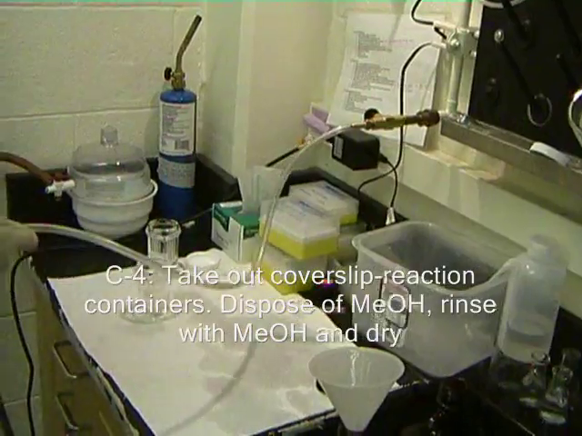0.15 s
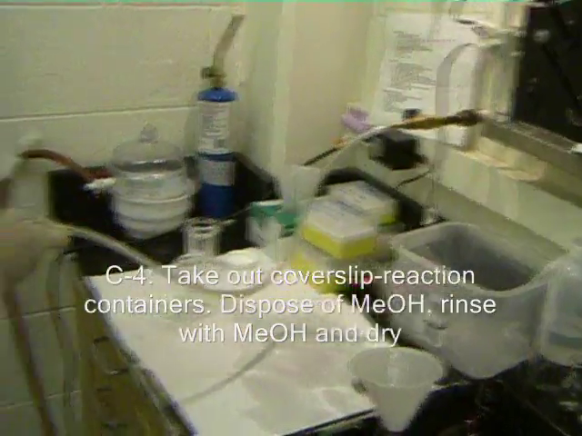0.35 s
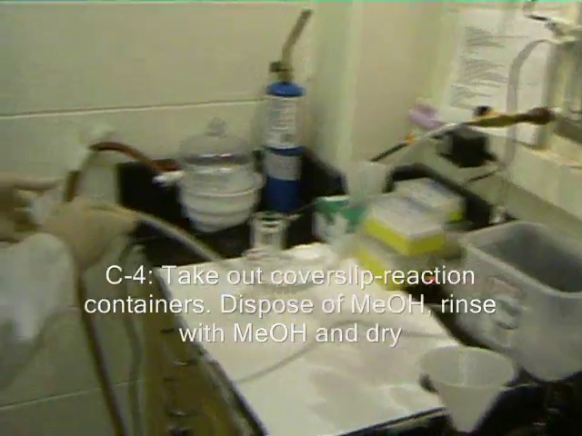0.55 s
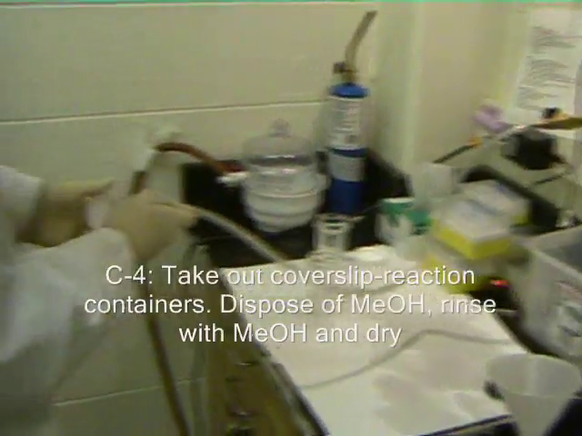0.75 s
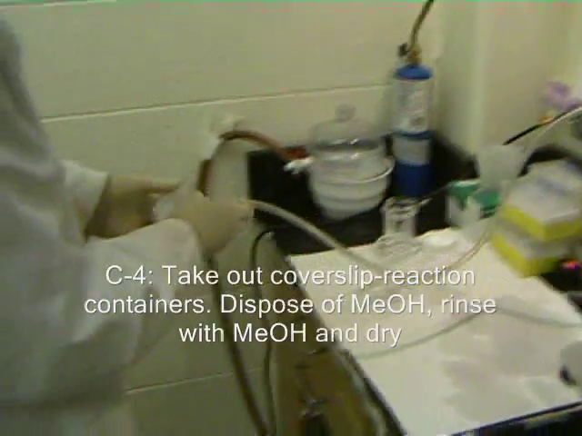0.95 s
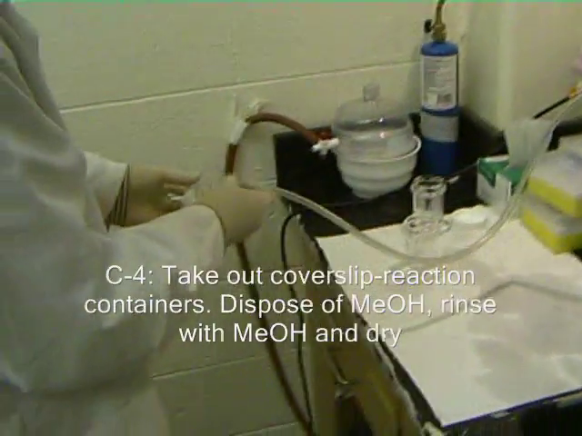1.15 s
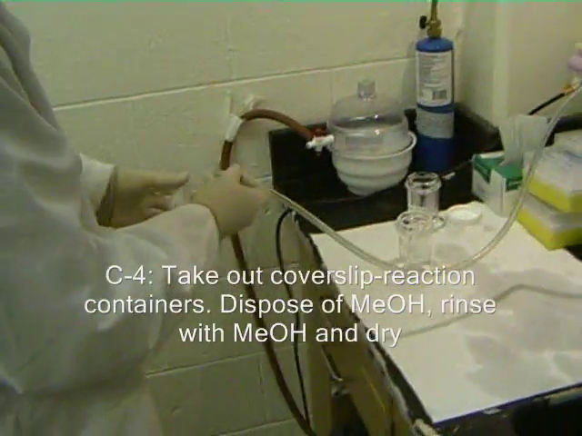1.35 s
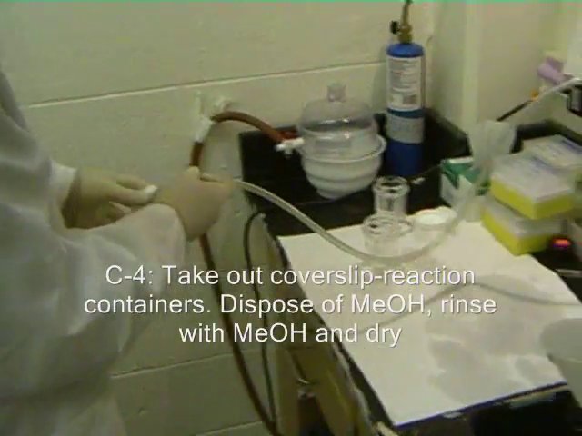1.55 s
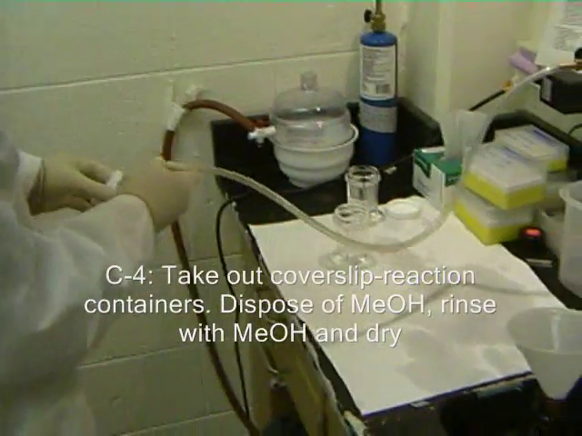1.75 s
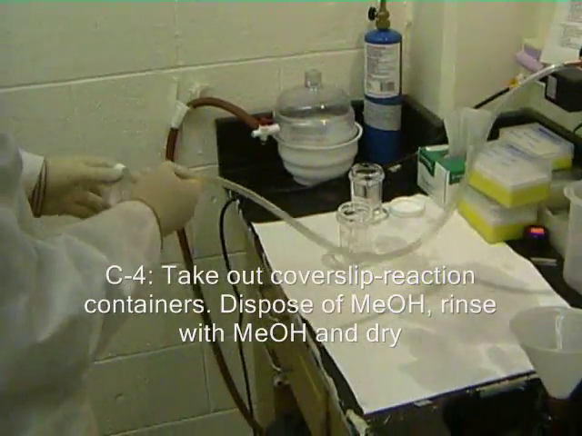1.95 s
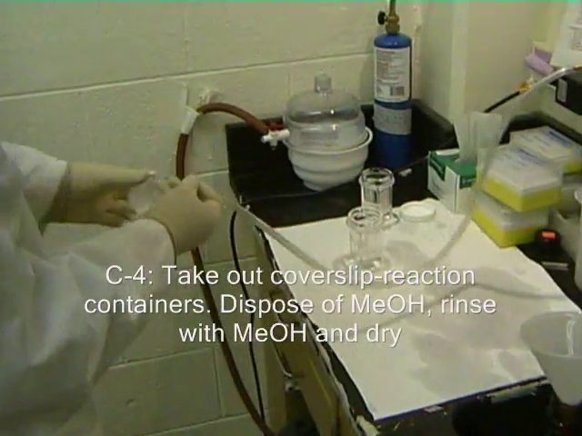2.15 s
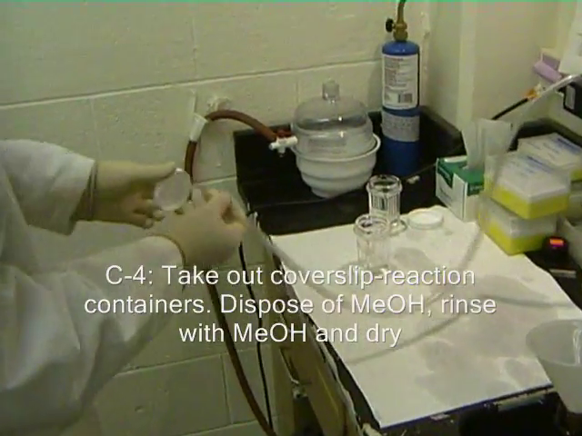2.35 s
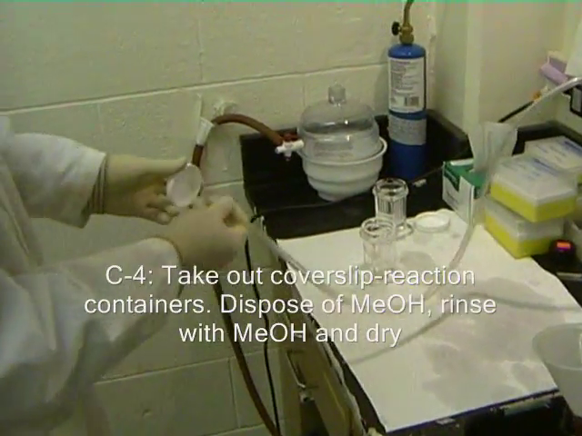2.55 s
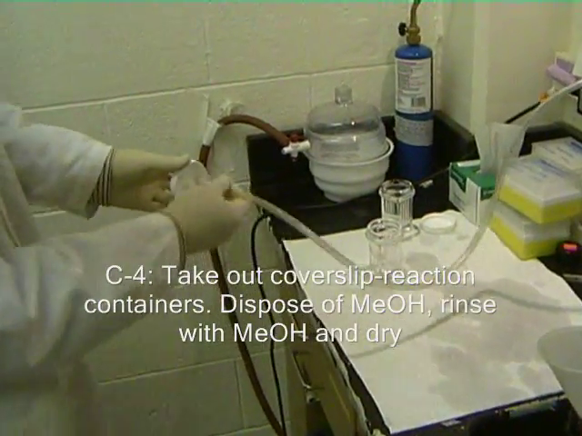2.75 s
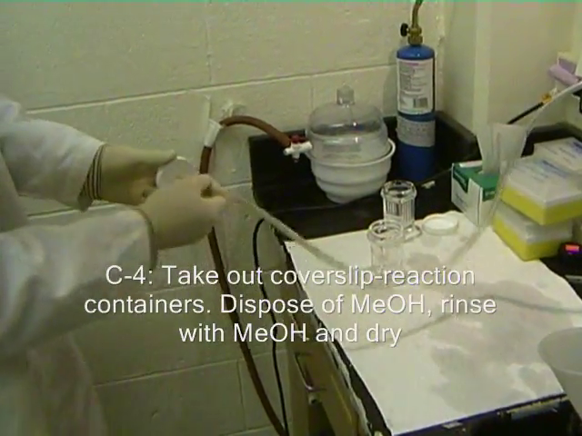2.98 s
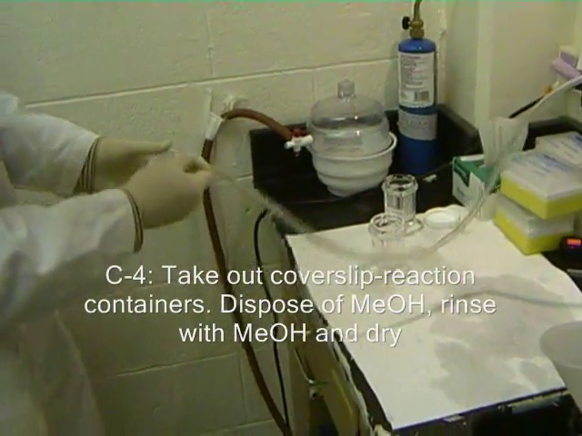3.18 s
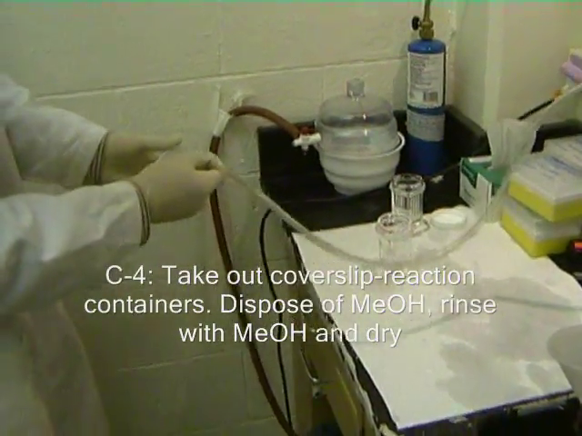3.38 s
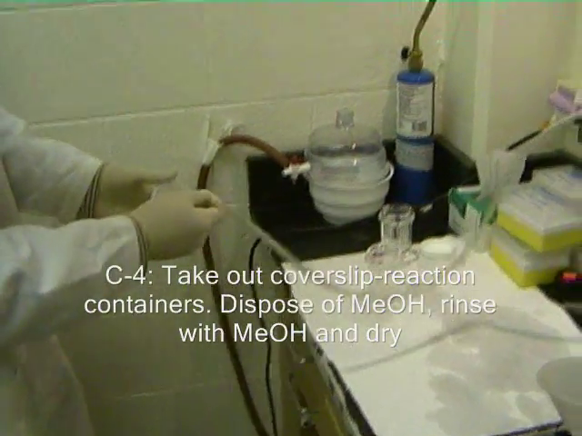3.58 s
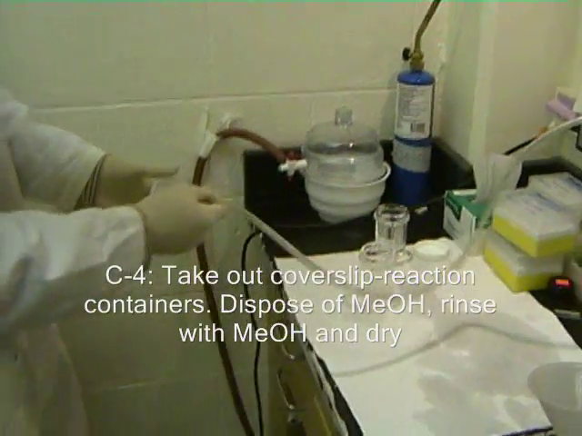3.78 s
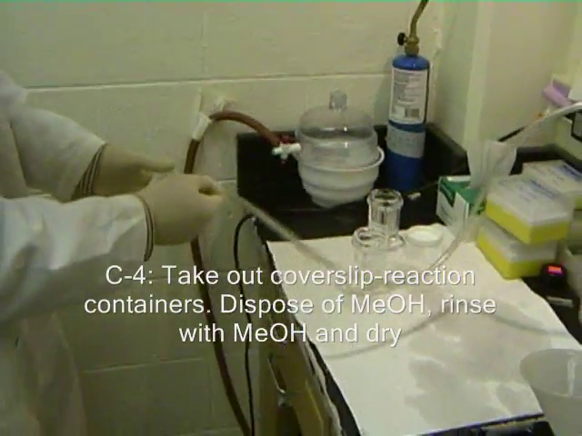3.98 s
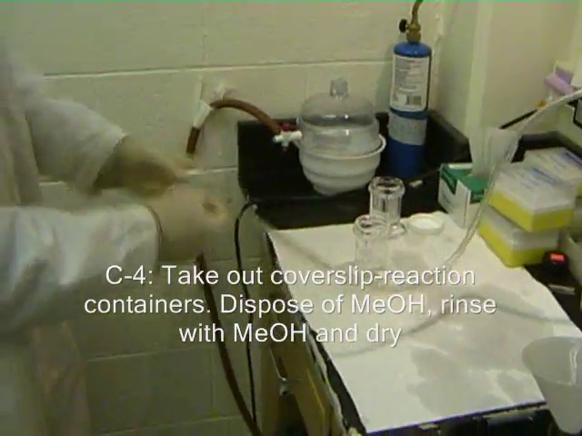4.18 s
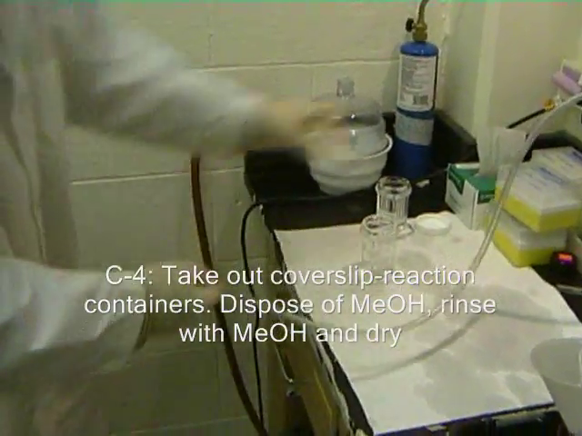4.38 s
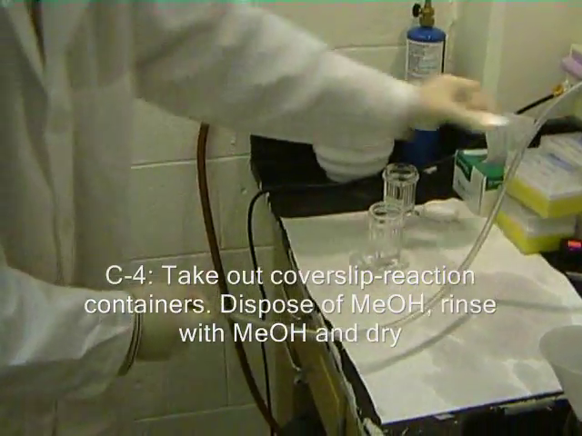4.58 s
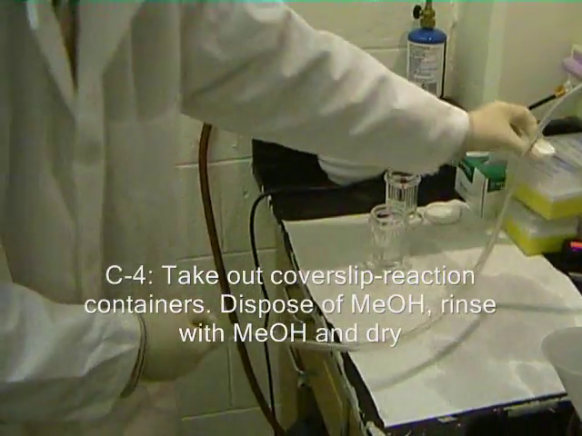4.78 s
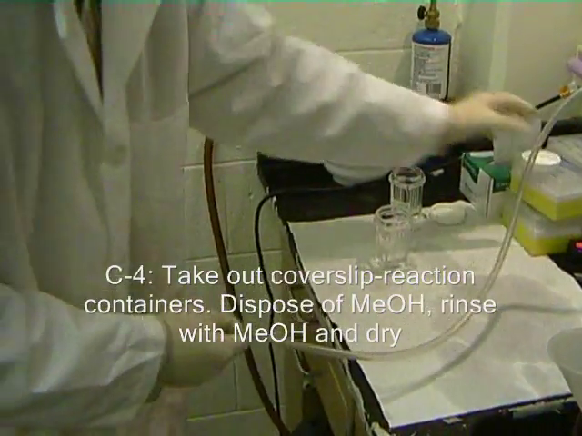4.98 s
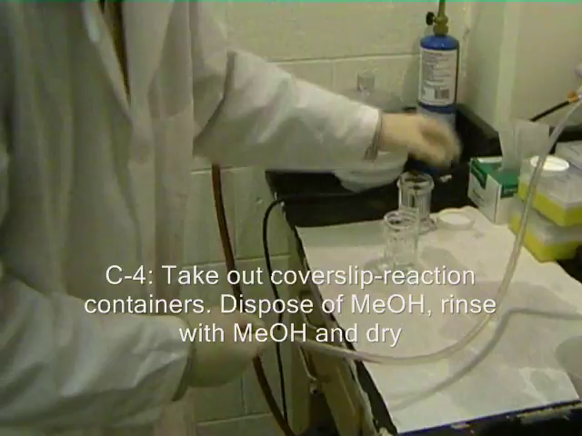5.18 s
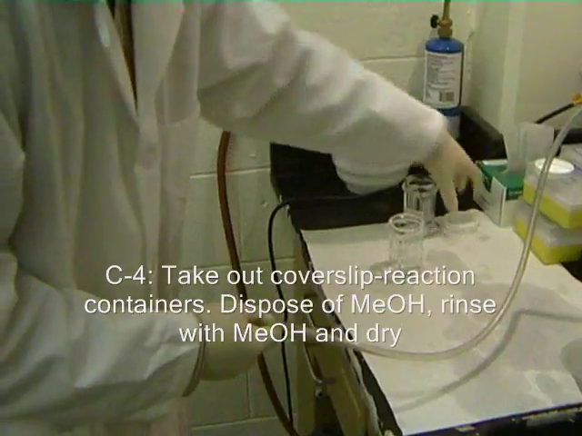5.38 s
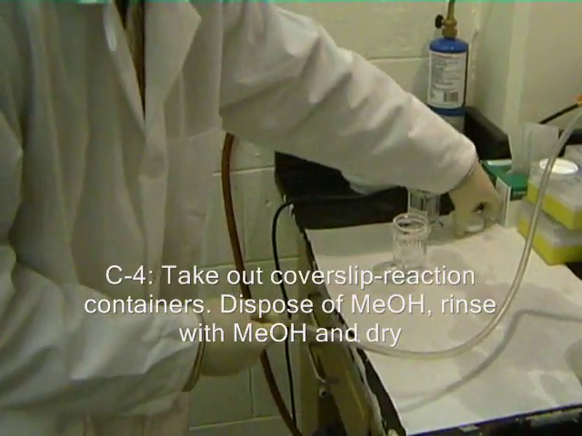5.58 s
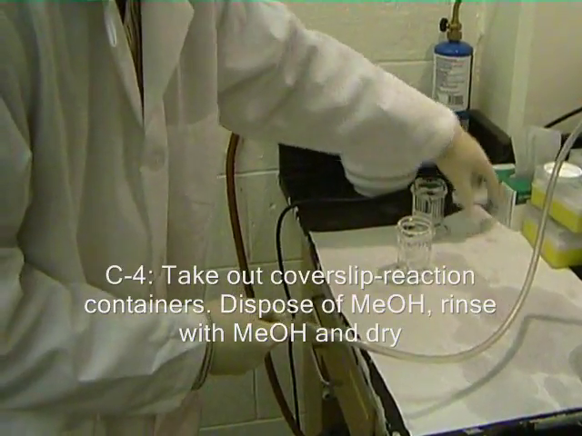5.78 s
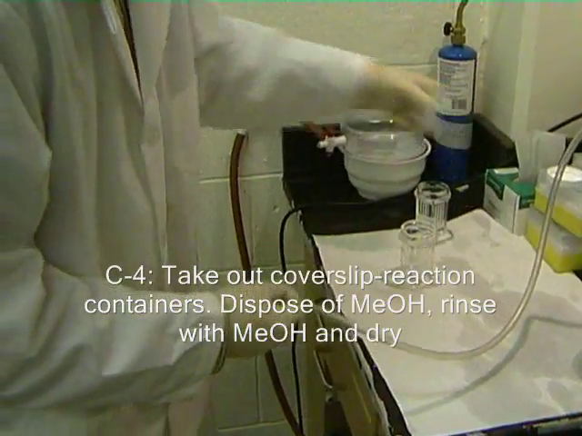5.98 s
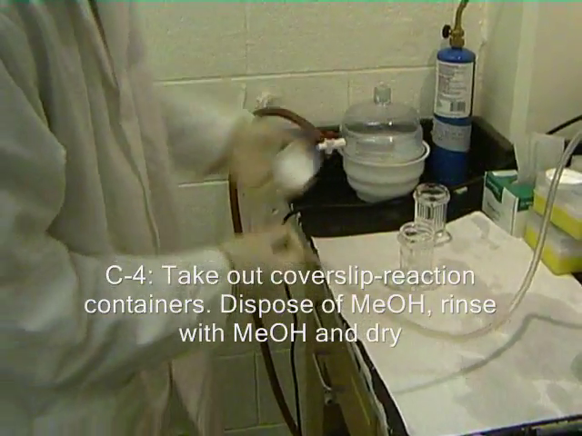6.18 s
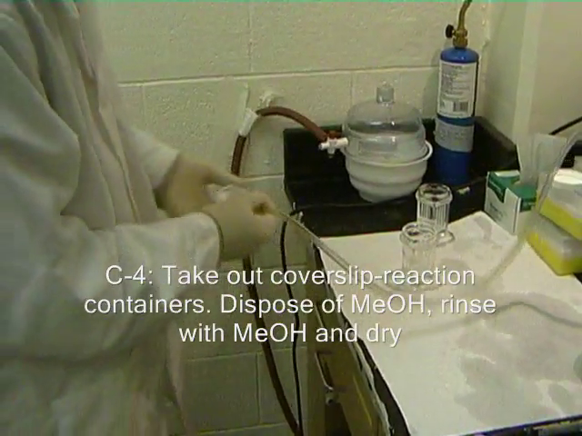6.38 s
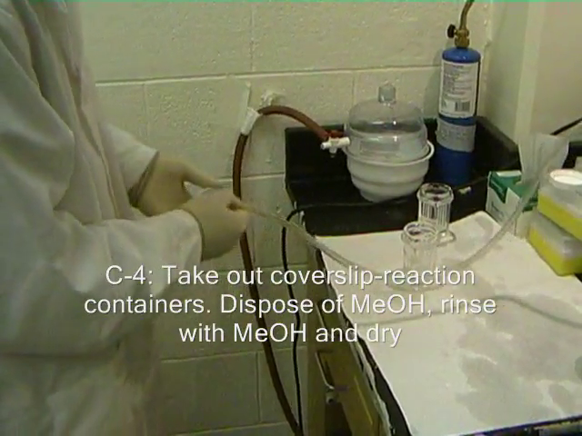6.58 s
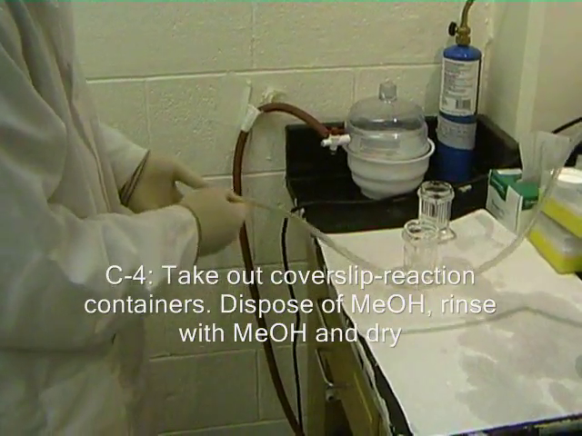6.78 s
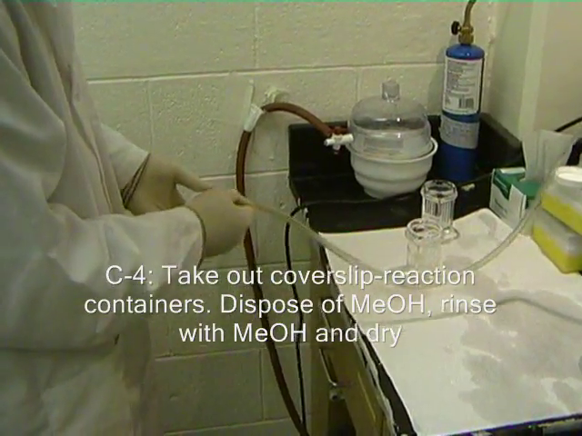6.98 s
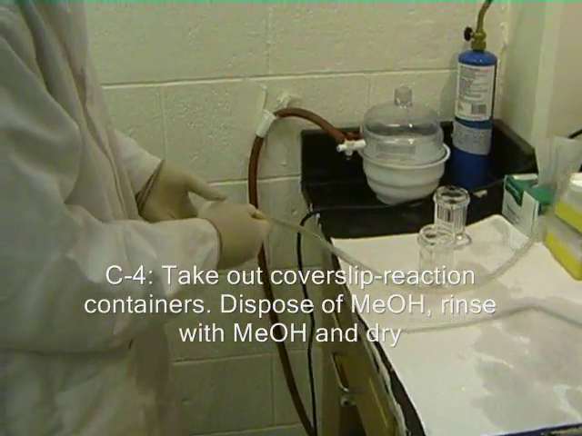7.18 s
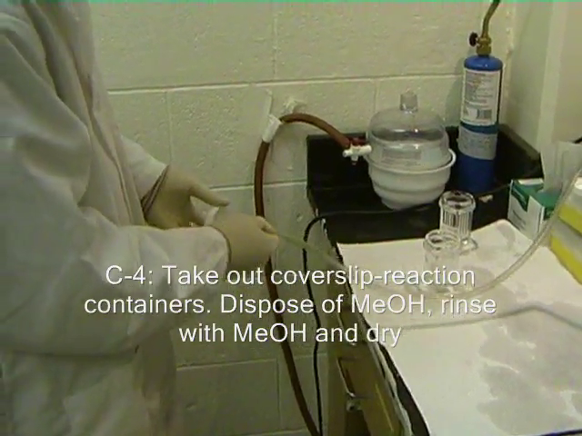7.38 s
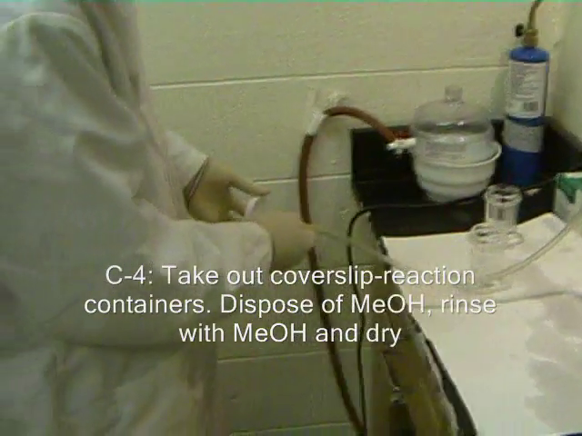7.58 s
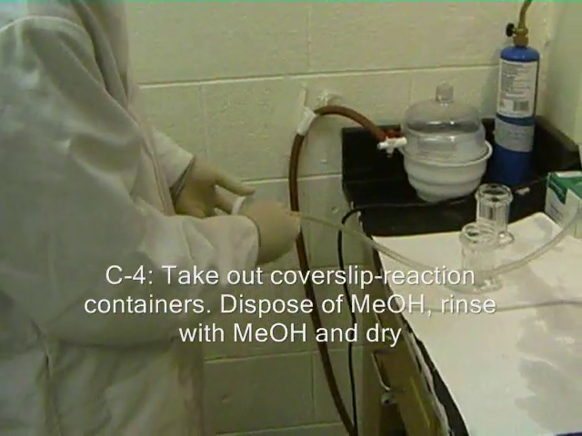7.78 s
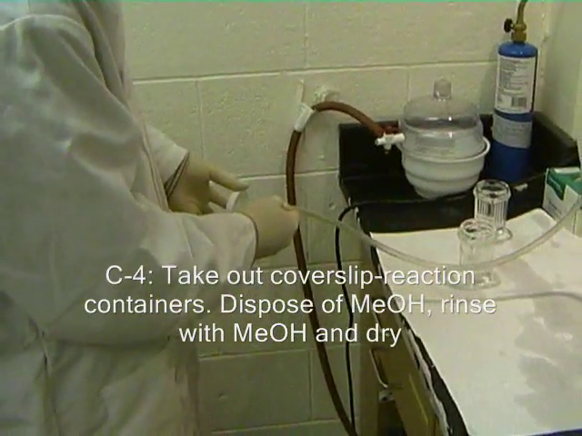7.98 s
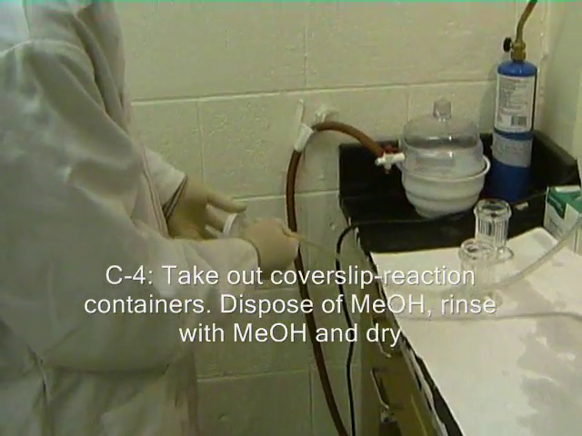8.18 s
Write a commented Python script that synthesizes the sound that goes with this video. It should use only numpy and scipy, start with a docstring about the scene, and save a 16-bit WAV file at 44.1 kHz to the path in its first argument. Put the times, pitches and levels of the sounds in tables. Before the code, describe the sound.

A jet of compressed gas hisses continuously, close to the microphone, in a small hard room with low, steady ventilation hum. From 0.2 to 0.8 seconds it bursts strongly into a small container, with rough hollow rushes and a soft low thump. Until about 4.3 seconds the hiss flutters restlessly, broken by short lower rushes and bright spurts at rims, notably around 1.5, 2.1 and a very sharp one at 3.0. Then it drops to a quieter, smoother open-air hiss, and at 5.07 a small hard piece clicks dryly on the bench. The free hiss grows slightly brighter and stronger until 6.3. At 6.5 a loud, hollow, almost whistling puff with a low thump marks the jet entering another container. Sputtering rushes continue, with spurts near 7.1 and 7.8, and the hiss is still running at the end, past 8 seconds.

```python
"""Gas hisses from a hose at close range, rushes lower and louder in containers and spurts at rims.
Midway the jet blows into open air and a piece clicks down on the bench; ventilation hums behind.
The gas is stereo noise shaped frame by frame by summed power spectra; click: decaying modes;
thumps: soft, decaying offset steps; ventilation: steady coloured noise. Loud spurts duck the mix."""
import sys
import numpy as np
from scipy import signal
from scipy.fft import rfft, irfft
from scipy.io import wavfile
from scipy.ndimage import uniform_filter1d

SR = 44100
rng = np.random.default_rng(int(sys.argv[2]) if len(sys.argv) > 2 else 0)


def int16_out(signal):
    """Quantize to a 16-bit WAV file."""
    q = np.round(np.clip(np.atleast_2d(signal).T, -1, 1) * 32767)
    wavfile.write(sys.argv[1], SR, q.astype(np.int16))


N = 363825
TOP_HZ = 15720  # upper band edge
FRAME, HOP = 512, 128  # samples
TIME = np.arange(N) / SR
FRAME_S = np.arange(N // HOP + 2) * HOP / SR
BIN_HZ = np.maximum(np.arange(FRAME // 2 + 1), .5)[:, None] * SR / FRAME

# nozzle dips into a container: start/s, end/s, level/dB, spectral knee/Hz
DIPS = [(0.173, 0.528, -22.5, 1730), (.52, 0.652, -16.5, 2920), (0.666, 0.816, -26.5, 1880),
        (1.012, 1.065, -25.5, 2300), (1.262, 1.412, -25, 2160), (1.49, 1.61, -24.5, 1650),
        (1.73, 1.85, -27.5, 1900), (1.944, 2.045, -23, 1700), (2.081, 2.142, -22, 1840),
        (2.165, 2.262, -26.5, 1830), (2.352, 2.514, -25.5, 2300), (2.66, 2.78, -26, 3020),
        (2.884, 2.924, -28, 2000), (3.333, 3.389, -23.5, 3330), (3.56, 3.664, -25, 3320),
        (3.824, 3.935, -24.5, 3800), (4.258, 4.34, -24, 2350), (6.397, 6.47, -30, 1200),
        (6.55, 6.696, -24.5, 2800), (6.712, 6.761, -25, 1920), (6.82, 6.87, -23.5, 2900),
        (6.927, 6.968, -25, 1700), (7.172, 7.22, -26, 4600), (7.28, 7.4, -27, 3150),
        (7.41, 7.517, -29, 2860), (7.52, 7.602, -23, 2620), (8.142, 8.188, -22.5, 3700)]
# container resonances: f/Hz, width/Hz, lift/dB
HOLLOW = [(1944, 49, 5), (2360, 64, 8), (2720, 42, 5.5), (2944, 89, 7), (4820, 160, 2), (7900, 420, 3),
          (10050, 5500, -3), (12200, 1700, 2)]


def gas(flutter_db=1.18, patchy_db=1.63, glove_echo=0.2, glove_lag_s=.0013, sway=0.212, open_width=0.69):
    """One turbulent flow: jet, rush, spurts, tone and whooshes add as power, then shape noise."""
    # side relative to mid at full contact: f/Hz, level/dB
    side_points = [(300, -31), (1000, -8), (2300, -15), (3200, -14), (5000, -5), (8000, -4.5),
                   (12000, -0.5), (16000, 4)]
    jet_power, jet_db = free_jet()
    rush_power, rush_gain = container_rush()
    power = jet_power + rush_power + rim_spurts() + cavity_tone() + whooshes()

    # reflection off the moving hand combs the hiss
    lag_s = glove_lag_s * np.exp(sway * walk(2.45))
    comb = 1 + glove_echo * np.cos(2 * np.pi * BIN_HZ * lag_s)

    # against a surface the jet flutters as a whole and in patches of pitch
    contact = rush_gain / (rush_gain + undb(jet_db - 11.5))
    patches = uniform_filter1d(walk(22, count=len(BIN_HZ)), size=9, axis=0)
    patches /= patches.std()
    flutter = undb(contact * (flutter_db * walk(60) + patchy_db * patches))
    gain = np.sqrt(power) * comb * flutter

    # gas scattered by the container sounds wider than the open jet
    width = colour(side_points, BIN_HZ) * (open_width + (1 - open_width) * contact)
    noise = rng.standard_normal((2, (len(FRAME_S) - 1) * HOP))
    mid, side = signal.stft(noise, nperseg=FRAME, noverlap=FRAME - HOP)[2]
    shaped = gain * spread(mid, side, width)
    return signal.istft(shaped, nperseg=FRAME, noverlap=FRAME - HOP)[1][:, :N]


def free_jet(offset_db=5.0, shield_db=-3):
    """Broadband jet hiss; brighter as the nozzle swings to the microphone, shielded by walls in dips."""
    # level before offset and shielding as the hose moves: t/s, level/dB
    level_points = [(0.0, -38.5), (0.2, -34.5), (0.34, -34), (0.82, -32.5), (1.15, -32), (1.77, -30),
                    (2.09, -31), (2.78, -30), (4.16, -30), (4.3, -35), (5.08, -37.5), (5.65, -34),
                    (6.25, -34), (6.69, -29.5), (6.87, -31), (7.74, -33.5), (7.9, -35), (8.25, -33.5)]
    # jet spectrum, relative: f/Hz, level/dB
    jet_points = [(150, -32.5), (700, -20), (1500, -9.5), (2400, -7), (2950, -3.5), (3700, -2), (5200, 2.5),
                  (6600, 2.5), (8000, 0), (9500, -2.5), (12100, 0.5), (14500, 0), (16000, -7)]
    # nozzle swing toward the microphone: t/s, aim/0-1
    aim_points = [(5.0, 0), (5.4, .8), (5.9, 1), (6.3, 0.6), (6.5, 0)]
    # forward beaming at full aim: f/Hz, width/Hz, lift/dB
    beam_modes = [(5160, 910, 1.5), (8800, 2900, -1), (12000, 2500, 5)]
    dipped = sum(stay(start, end) for start, end, _, _ in DIPS)
    level_db = np.interp(FRAME_S, *np.transpose(level_points)) + offset_db + shield_db * dipped
    beam = resonances(beam_modes, BIN_HZ) ** np.interp(FRAME_S, *np.transpose(aim_points))
    return unit(colour(jet_points, BIN_HZ) * beam) * undb(level_db) ** 2, level_db


def container_rush(wander_db=1.5, wander_hz=3):
    """Eddies ring the container; returns power and total gain. Dips are mostly louder and lower."""
    # container held in the jet: start/s, end/s, level/dB, spectral knee/Hz
    holds = [(-.2, 0.023, -28, 3500), (.17, 3.04, -30, 2970), (3.1, 4.35, -28, 3680),
             (6.46, 8.4, -30, 3600)]
    start_s, end_s, db, knee_hz = np.transpose(holds + DIPS)[:, :, None]
    # the hand is never still
    rush = stay(start_s, end_s) * undb(db + wander_db * walk(wander_hz)) ** 2
    spectra = unit(resonances(HOLLOW, BIN_HZ) * eddies(knee_hz.T, rise=4.0, fall=1.22))
    return spectra @ rush, np.sqrt(rush.sum(axis=0))


def rim_spurts():
    """Short bursts of eddies as the jet crosses a rim or a fingertip."""
    # crossings: t/s, peak/dB, sigma/s, spectral knee/Hz
    crossings = [(0.199, -16.5, 0.0065, 7110), (0.252, -13.5, 0.015, 4870), (0.529, -11.5, 0.0087, 5460),
                 (0.603, -14, 0.017, 5100), (1.028, -24, 0.026, 6490), (1.247, -26.5, 0.0033, 800),
                 (1.508, -11.5, 0.0072, 3270), (1.615, -15, 0.015, 9500), (1.703, -18.5, 0.026, 8000),
                 (1.809, -17, 0.0097, 5930), (1.936, -15, 0.004, 6140), (2.046, -16.5, 0.0045, 6120),
                 (2.117, -13.5, 0.0079, 4460), (2.186, -15.5, 0.0062, 2050), (2.253, -14.5, 0.0081, 4580),
                 (2.58, -20.5, 0.011, 4110), (2.638, -18.5, 0.029, 7450), (2.841, -19, 0.011, 5660),
                 (2.93, -19, 0.02, 6400), (3.005, -11.5, 0.011, 5830), (3.024, -4, 0.001, 4740),
                 (3.148, -17, 0.014, 7450), (3.253, -15.5, 0.0089, 8240), (3.474, -16.5, 0.011, 6740),
                 (3.509, -12, 0.0049, 6600), (3.734, -16.5, 0.0067, 4300), (3.867, -24, 0.0086, 6500),
                 (4.105, -27, 0.016, 2800), (4.171, -21.5, 0.01, 4600), (4.297, -12, 0.011, 5770),
                 (6.484, -15, 0.013, 1970), (6.518, -10, 0.023, 3120), (6.704, -18.5, 0.0096, 8800),
                 (6.722, -32, 0.011, 990), (6.762, -20, 0.0085, 8420), (6.918, -20.5, 0.0067, 8410),
                 (6.973, -22, 0.015, 7900), (7.07, -12.5, 0.013, 4200), (7.303, -17.5, 0.013, 8330),
                 (7.343, -22.5, 0.011, 4070), (7.706, -23.5, 0.013, 5730), (7.803, -15, 0.014, 5130),
                 (7.852, -19.5, 0.0082, 3870), (8.039, -18.5, 0.014, 8950), (8.123, -17, 0.012, 10000)]
    s, db, sigma_s, knee_hz = np.transpose(crossings)[:, :, None]
    spectra = unit(resonances(HOLLOW, BIN_HZ) * eddies(knee_hz.T, rise=4.66, fall=1.59))
    return spectra @ swell(s, db, sigma_s)


def cavity_tone(cavity_hz=2990, half_width_hz=330):
    """The jet aims into the mouth and the cavity sings: a narrow noise band."""
    # jet at the mouth: t/s, peak/dB, sigma/s
    blows_across = [(0.239, -21, 0.01), (1.308, -25, 0.013), (3.214, -29.5, .022), (3.635, -39, 0.039),
                    (4.296, -26, 0.011), (6.495, -7, 0.013), (6.524, -15, 0.018)]
    band = unit(1 / (1 + ((BIN_HZ - cavity_hz) / half_width_hz) ** 2))
    return band * sum(swell(*row) for row in blows_across)


def whooshes(knee_hz=420):
    """Low eddies as the gas swirls past glove and sleeve."""
    # swirls: t/s, peak/dB, sigma/s
    swirls = [(0.18, -42.5, 0.059), (1.302, -48, 0.023), (1.78, -38.5, 0.012), (6.42, -42, 0.038)]
    return unit(eddies(knee_hz, rise=3.7, fall=1.65)) * sum(swell(*row) for row in swirls)


def knocks(contact_s=0.00026, lowest_hz=300):
    """Piece set down: damped modes that build during contact and die in milliseconds."""
    # contacts, scaling the modes: t/s, level/dB
    contacts = [(5.0647, -10), (5.0667, -33), (5.067, -25)]
    # modes of the piece: f/Hz, level/dB, t60/s
    piece_modes = [(600, -14, 0.02), (1400, -15.5, 0.028), (2340, -15, 0.011), (2580, 3, 0.0068),
                   (3350, -2, 0.0087), (4170, -5, 0.0093), (5400, -4, .008), (7340, -5, .005)]
    t = TIME[:SR // 4]
    ring = sum(undb(db) * np.cos(2 * np.pi * hz * t) * undb(-60 * t / t60_s) for hz, db, t60_s in piece_modes)
    blows = np.zeros(N)
    for s, db in contacts:
        blows[int(s * SR)] += undb(db)
    click = signal.fftconvolve(blows, ring * (1 - np.exp(-t / contact_s)))[:N]
    return signal.sosfilt(signal.butter(2, lowest_hz, "high", fs=SR, output="sos"), click)


def thumps(rise_s=0.0058, decay_s=0.052):
    """Low thumps under the hardest spurts: offset steps that rise softly and decay."""
    # steps, timed at mid-rise: t/s, level/dB
    steps = [(.243, -27.5), (.525, -37), (1.5, -31), (2.255, -49), (2.995, -41), (4.292, -34), (6.483, -22),
             (7.07, -42), (7.8, -38)]
    out = np.zeros(N)
    for s, db in steps:
        age_s = np.maximum(TIME - s + rise_s / 2, 0)
        rise = np.sin(np.pi / 2 * np.minimum(age_s / rise_s, 1)) ** 2
        out += undb(db) * rise * np.exp(-age_s / decay_s)
    return out


def ventilation(rms_db=-44.0, pan_db=2.0):
    """Steady air noise with a low hum and duct resonances."""
    # air spectrum, relative: f/Hz, level/dB
    air_points = [(20, 5), (60, -16), (95, -8), (150, 0.5), (230, -3), (330, -5), (470, -6.5), (630, -4.5),
                  (1200, -8), (3000, -11), (12000, -28.5)]
    # duct resonances: f/Hz, width/Hz, lift/dB
    duct_modes = [(118.7, 4.1, 13.8), (267, 35, 4), (367, 41, 8.8), (871, 30, 6.5)]
    # side relative to mid: f/Hz, level/dB
    side_points = [(25, 15), (60, 10), (125, 11.5), (250, 0), (500, -4), (1500, -13.5)]
    hz = np.maximum(np.arange(N // 2 + 1) * SR / N, 1)
    noise = rfft(rng.standard_normal((2, N)))
    mid, side = noise * colour(air_points, hz) * resonances(duct_modes, hz)
    air = irfft(spread(mid, side, colour(side_points, hz)), N)
    return air / air.std() * undb(rms_db + np.array([[pan_db], [-pan_db]]) / 2)


def room(x, shared_db, apart_db, t60_s):
    """Wall and bench reflections: one part alike at both microphones, one opposite in sign."""
    t = TIME[:SR // 3]
    tails = rng.standard_normal((2, len(t))) * undb(-60 * t / t60_s) * (t > .002)
    shared, apart = tails / np.linalg.norm(tails, axis=1, keepdims=True)
    echoes = undb(shared_db) * shared + undb(apart_db) * np.array([apart, -apart])
    echoes[:, 0] = 1  # direct sound
    return signal.fftconvolve(np.atleast_2d(x), echoes / np.linalg.norm(echoes[0]), axes=1)[:, :N]


def undb(db):
    """Decibels to gain."""
    return 10 ** (np.asarray(db) / 20)


def colour(points, hz):
    """Gain of (f/Hz, level/dB) points joined on a log-frequency axis."""
    f, db = np.transpose(points)
    return undb(np.interp(np.log(hz), np.log(f), db))


def resonances(modes, hz):
    """Gain of bell-shaped lifts, summed in dB."""
    return undb(sum(db / (1 + (2 * (hz - f) / width) ** 2) for f, width, db in modes))


def walk(rate_hz, count=1):
    """Smooth random rows, overall spread 1, one value a frame."""
    k = max(int(SR / HOP / rate_hz), 1)
    rows = uniform_filter1d(uniform_filter1d(rng.standard_normal((count, len(FRAME_S))), k), k)
    return rows / rows.std()


def unit(gain):
    """Power spectrum cut near TOP_HZ, with a mean of 1 over all bins."""
    power = gain ** 2 * (BIN_HZ < TOP_HZ + SR / FRAME)
    return power / power.mean(axis=0)


def eddies(knee_hz, rise, fall):
    """Turbulence gain: power rises steeply to the main eddies' size, falls gently above."""
    ratio = BIN_HZ / knee_hz
    return np.sqrt(ratio ** rise / (1 + ratio ** (rise + fall)))


def swell(s, db, sigma_s):
    """Gaussian power over time as the jet sweeps across a spot."""
    return undb(db) ** 2 * np.exp(-.5 * ((FRAME_S - s) / sigma_s) ** 2)


def stay(start_s, end_s, move_in_s=0.015, move_out_s=0.012):
    """Share 0-1 of the jet on a spot: the hand moves it in, holds it and moves it out."""
    arrive = (1 + np.tanh((FRAME_S - start_s) / move_in_s)) / 2
    leave = (1 - np.tanh((FRAME_S - end_s) / move_out_s)) / 2
    return arrive * leave


def spread(mid, side, width):
    """Left and right from mid and side, keeping the power."""
    return np.array([mid + width * side, mid - width * side]) / np.sqrt(1 + width ** 2)


def scene(gas_pan_db=-0.74):
    """Hose close to the microphones, with bench, room and ventilation."""
    pan = undb(np.array([[gas_pan_db], [-gas_pan_db]]) / 2)
    hiss = room(gas(), shared_db=-9.5, apart_db=-24.0, t60_s=0.13) * pan
    click = room(knocks(), shared_db=-2.5, apart_db=-12, t60_s=0.18)
    return hiss + click + thumps() + ventilation()


def gain_control(x, threshold_db=-18, slope=0.71, release_db_per_s=26):
    """Loud spurts pull the gain down at once; it recovers slowly."""
    mean_power = uniform_filter1d(np.mean(x ** 2, axis=0), size=500)
    level_db = 10 * np.log10(np.maximum(mean_power, 1e-12))
    over_db = np.maximum(level_db - threshold_db, 0) * slope
    release_db = release_db_per_s * TIME
    held_db = np.maximum.accumulate(over_db + release_db) - release_db
    return x * undb(-held_db)


def record(dry):
    """Gain control, then a steep low-pass at TOP_HZ."""
    top_cut = signal.ellip(12, .1, 80, TOP_HZ, fs=SR, output="sos")
    return signal.sosfilt(top_cut, gain_control(dry))


dry = scene()
out = record(dry)
int16_out(out)
```